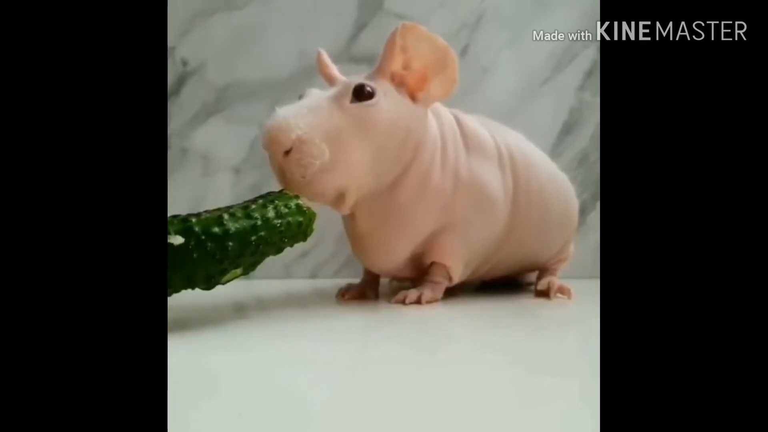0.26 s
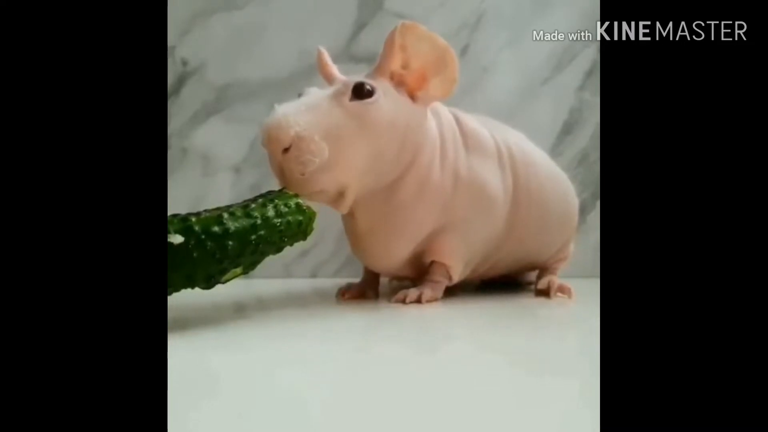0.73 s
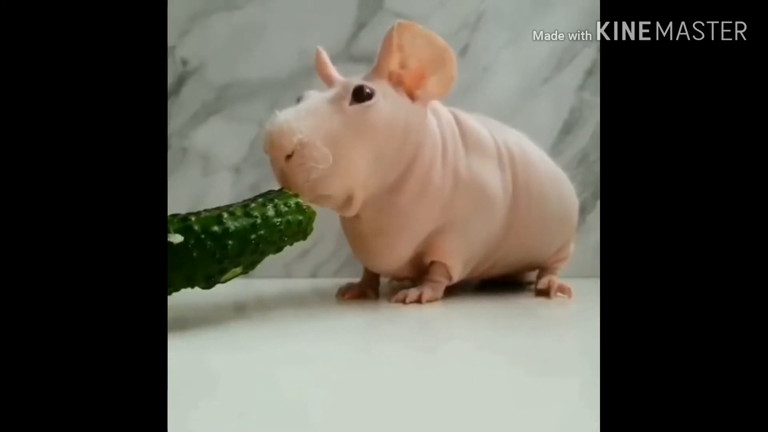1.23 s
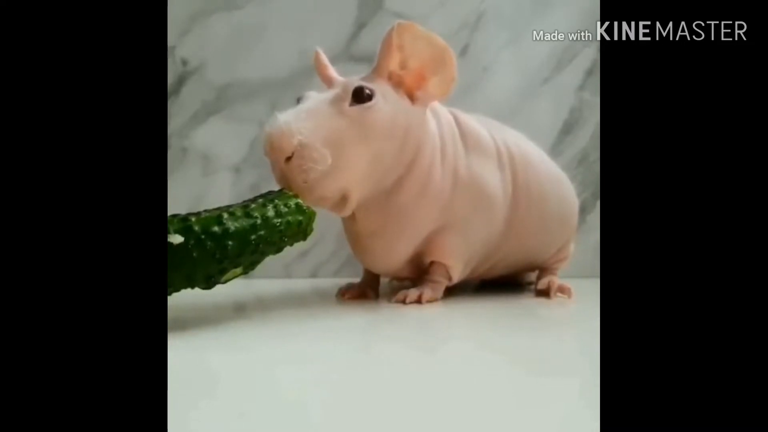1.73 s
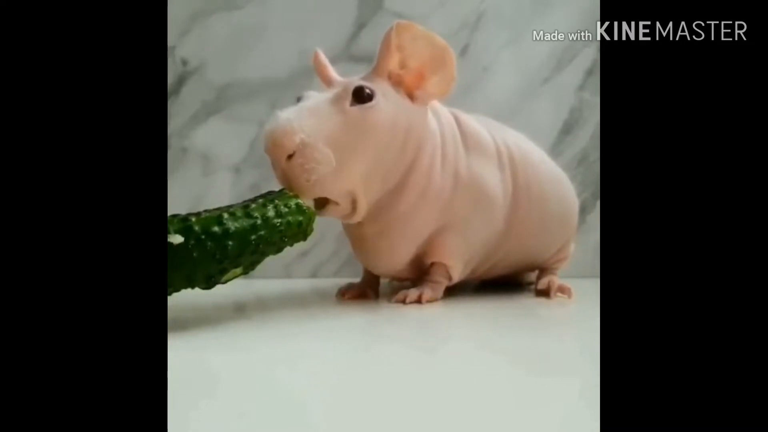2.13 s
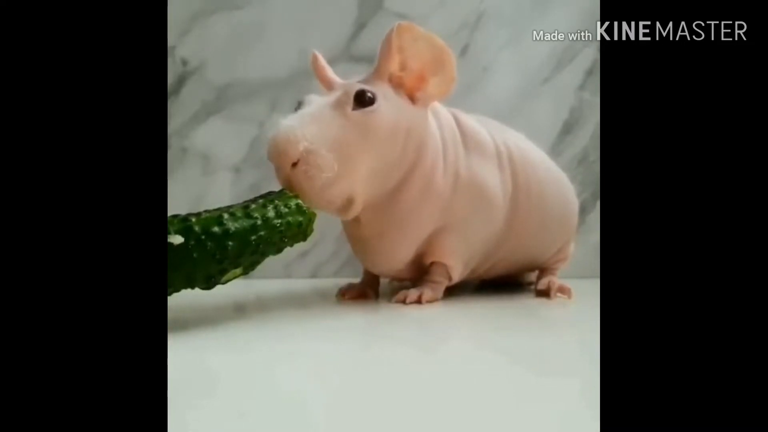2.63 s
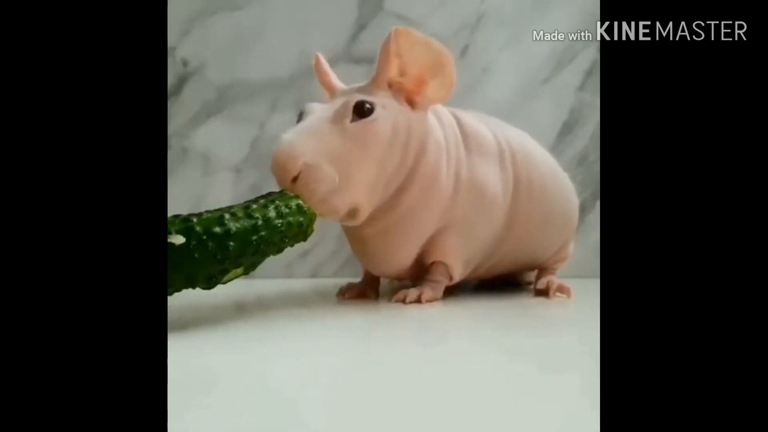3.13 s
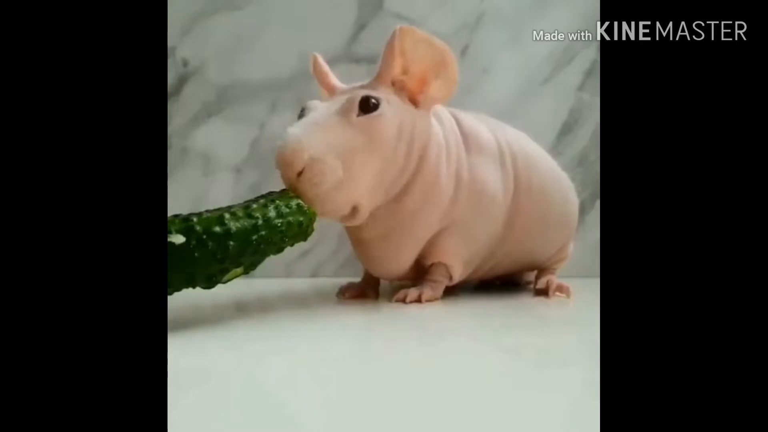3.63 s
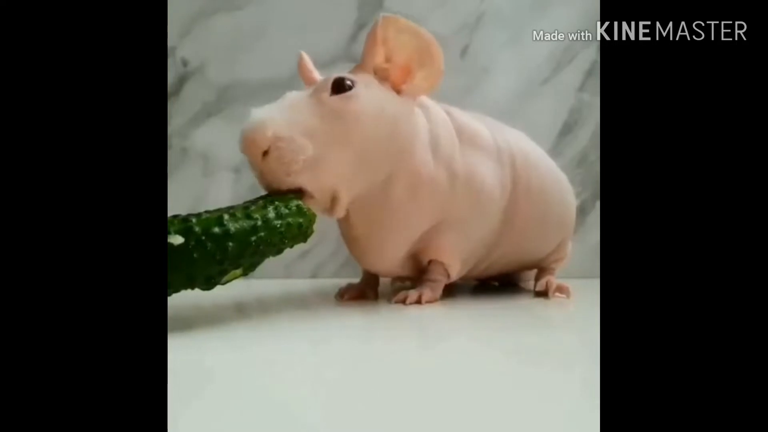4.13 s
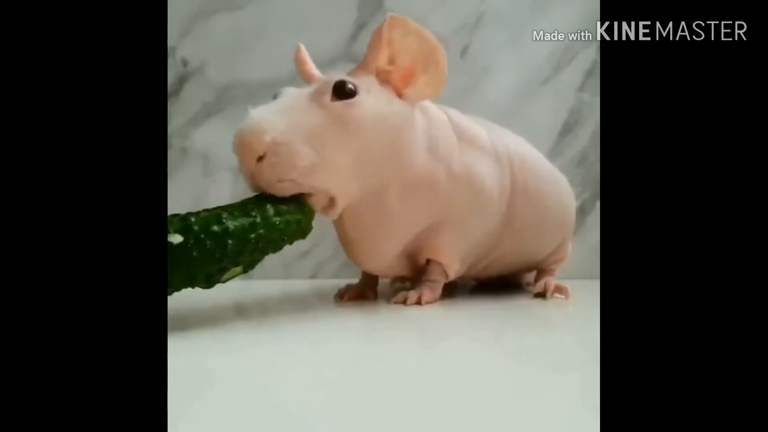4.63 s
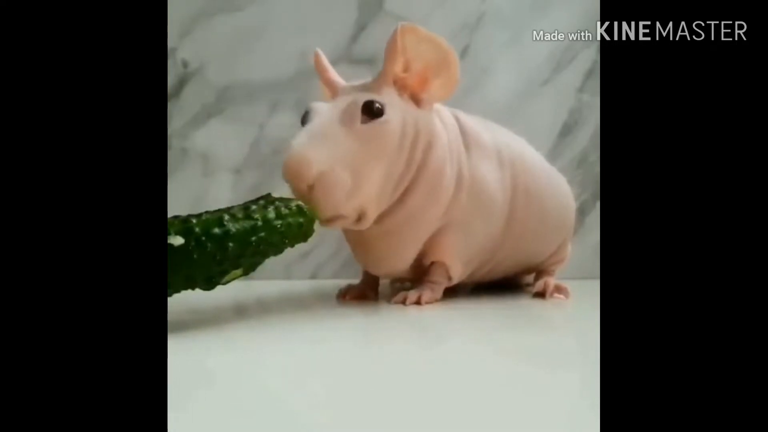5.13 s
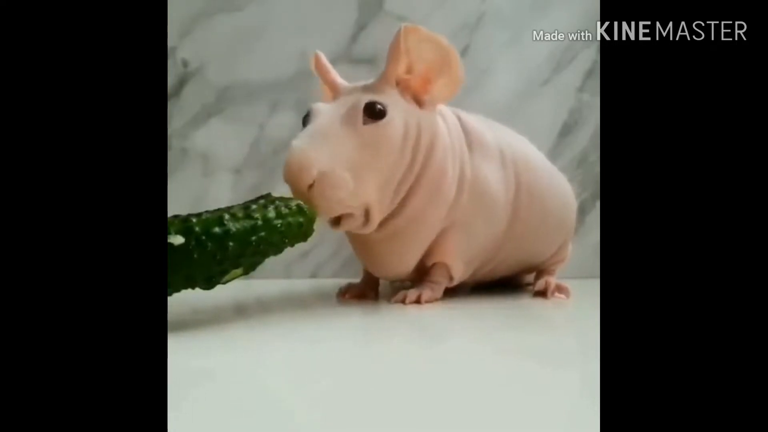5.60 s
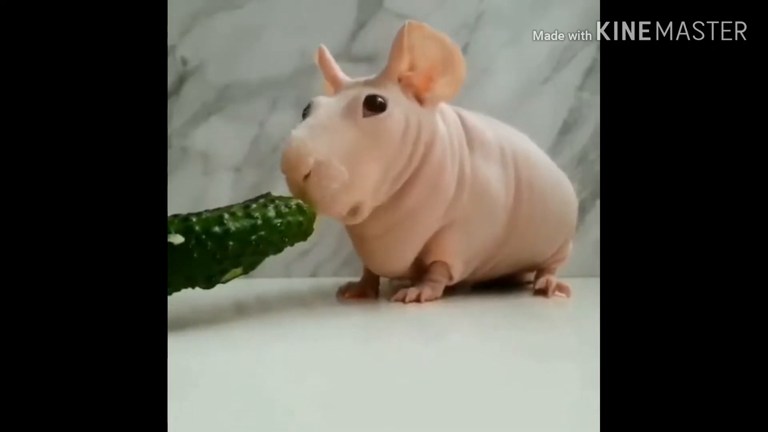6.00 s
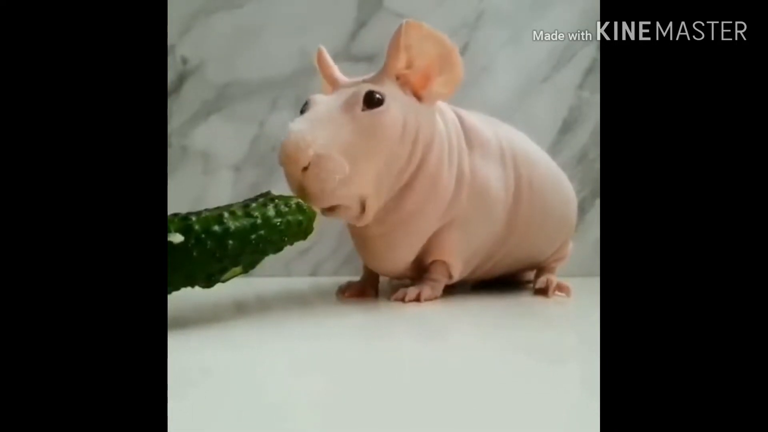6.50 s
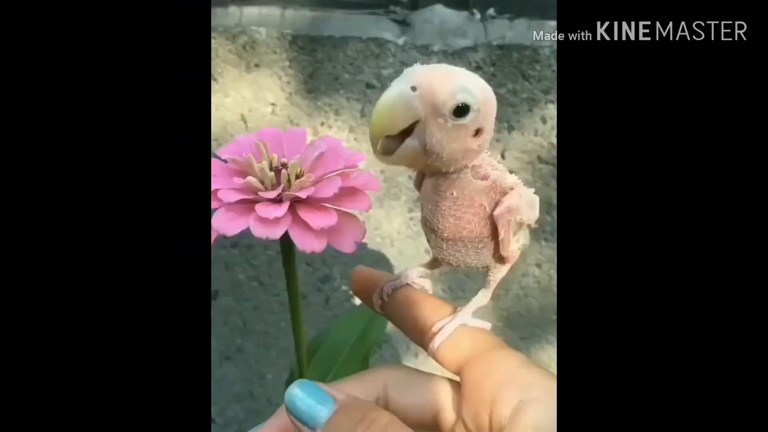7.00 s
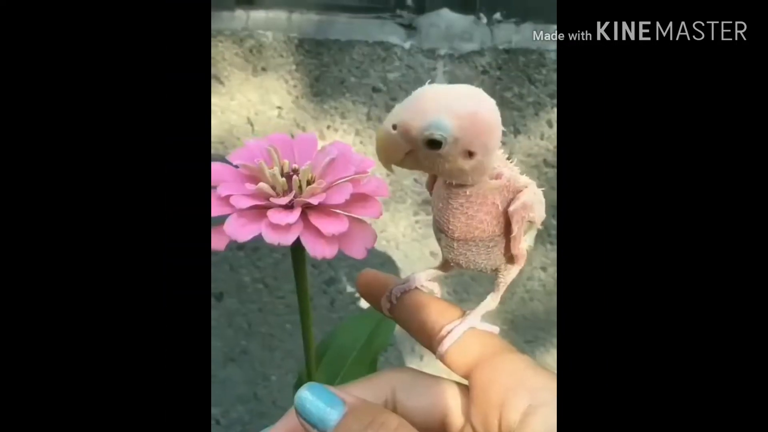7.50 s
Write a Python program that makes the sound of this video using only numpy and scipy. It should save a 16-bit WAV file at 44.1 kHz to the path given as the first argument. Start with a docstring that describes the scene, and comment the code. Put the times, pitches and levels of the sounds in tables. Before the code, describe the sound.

Close, soft, steady wet chewing of cucumber over low room rumble, two crisp bites, two sharp snaps, brief silence, then a bird squeak and swelling drone.

```python
"""Soft, steady crunching comes first, over a low room rumble: a guinea pig chews cucumber close to a microphone.
Its back teeth burst clouds of tiny cells about six times a second, with small wet ticks in between.
It tears off a new piece with two crisp bites, nibbles and chews on, and two bits snap sharply.
After a moment of silence, outdoors: a parrot chick's short squeak made of overtones, a high shimmer of
filtered noise that fades, and an engine-like drone of steady tones and noise that swells."""
import sys
import numpy as np
from scipy import signal
from scipy.fft import rfft, irfft
from scipy.io import wavfile
from scipy.ndimage import uniform_filter1d

SR = 44100
rng = np.random.default_rng(int(sys.argv[2]) if len(sys.argv) > 2 else 0)


def store_pcm(level_fs):
    """Save levels as 16-bit WAV."""
    pcm = np.round(np.clip(level_fs, -1, 1) * 32767).astype(np.int16)
    wavfile.write(sys.argv[1], SR, np.atleast_2d(pcm).T)


N = 341774
TIME = np.arange(N) / SR
INDOOR_END_S, OUTDOOR_START_S = 6.885, 7.1255
EDGE_HZ = 14300  # top of the recorder's band

# Levels are starting values: envelopes and the gains in the functions still act on them.
# All spectra list f/Hz, level/dB and give only the shape of the sound.

# Room rumble over time: t/s, level/dB
RUMBLE_LEVEL = [(0, -68), (2.65, -67), (3.0, -55), (3.36, -57), (3.5, -63.5), (4.45, -61.5), (4.77, -58.5),
                (4.88, -71), (6.15, -69), (6.88, -73.5)]
# Spectrum of the room rumble: f/Hz, level/dB
ROOM_SPECTRUM = [(15, -34.5), (30, -13), (45, 3.5), (65, -6.5), (92, 6.5), (125, -6.5), (175, -3),
                 (250, -14), (350, -17), (600, -35), (1200, -42.5), (4000, -49)]
# Spectrum of the microphone hiss: f/Hz, level/dB
HISS_SPECTRUM = [(100, 1.5), (600, 0), (1500, -1.5), (2200, -0.5), (3700, -1.5), (6000, -2.5), (9000, -5),
                 (12400, 1.5), (13000, -5.5), (13500, -28.5)]
# Deep hums that rise and stop: t/s, length/s, first f/Hz, last f/Hz, first level/dB, last level/dB
DEEP_HUMS = [(1.331, 1.101, 36.2, 41.5, -64, -52.5), (4.045, .68, 42.3, 43.9, -64, -61.5)]
# When in the hum it speeds up (share of its length), how fast, and its fade at both ends
HUM_TURN_SHARE, HUM_TURN_S, HUM_FADE_S = 0.59, 0.12, 0.1

# Open-air wash over time: t/s, level/dB
STREET_LEVEL = [(7.19, -75), (7.35, -61.5), (7.47, -61), (7.75, -54.5)]
# Spectrum of the open-air wash: f/Hz, level/dB
STREET_SPECTRUM = [(20, -22.5), (60, 4), (140, 9), (200, 0), (400, -2), (650, -7), (950, -7.5), (1600, -14),
                   (2500, -18.5), (4000, -28), (7000, -34), (13500, -37), (14200, -68.5)]
# Swell of the drone, shared by its tones and its rumble: t/s, level/dB
DRONE_SWELL_LEVEL = [(7.13, -22.5), (7.3, -5), (7.57, -8.5), (7.65, 4), (7.75, -1)]
# Tones of the drone, before the swell: f/Hz, level/dB
DRONE_TONES = [(61, -53.5), (112, -49), (239, -80), (335, -69.5), (942, -80), (1394, -71.5)]
# Spectrum of the drone's rumble: f/Hz, level/dB
DRONE_SPECTRUM = [(20, -24), (35, -13.5), (50, -5.5), (62, 1), (95, 0.5), (125, -10), (170, -28.5),
                  (400, -75)]
# Spectrum of the brighter noise as the drone nears: f/Hz, level/dB
GLARE_NOISE_SPECTRUM = [(900, -25.5), (1900, -1), (2500, 2), (3200, -13), (4500, -20), (9000, -39)]
GLARE_START_S, GLARE_RISE_S = 7.6, 0.14
# Spectrum of the high shimmer: f/Hz, level/dB
SHIMMER_SPECTRUM = [(1500, -29.5), (3000, -21), (4000, -17), (4600, -4.5), (5200, -6), (5800, -16.5),
                    (9500, -24), (11400, -28), (13300, -29), (14200, -51)]
SHIMMER_FADE_DB_PER_S = 41.5

# The squeak in its lower register: t/s, f/Hz, level/dB
SQUEAK_PATH = [(7.126, 2524, -31.5), (7.132, 2680, -29), (7.141, 3184, -29.5), (7.148, 2516, -30),
               (7.155, 2374, -33), (7.162, 1686, -40), (7.17, 1640, -49)]
# Leaps of the squeak to a louder, purer upper register: t/s, length/s, f/Hz, sag/Hz per s
SQUEAK_LEAPS = [(7.134, 0.0057, 4770, 34800), (7.1415, .0059, 5350, 150000)]
LEAP_EDGE_S, LEAP_DB = 0.0014, 4.7
LOW_SECOND_DB, HIGH_SECOND_DB = 13.5, -13.5  # second harmonic against the first, in each register
# Roughness 0-1: the lower register grows hoarse as it runs out
ROUGH_START, ROUGH_END, ROUGH_HIGH = 0.44, 0.91, 0.19

# Ringing modes of the cucumber, lowest first: f/Hz, level/dB, factor on the decay
CUCUMBER_MODES = [(350.7, 1.5, 1.0), (520, -11, 0.99), (744, -3.5, 0.99), (847, -7.5, 0.34),
                  (1230, -11, 0.7), (1570, -11.5, 1)]
# Spectrum of the dull thud of its soft flesh: f/Hz, level/dB
THUD_SPECTRUM = [(90, -11.5), (200, 0), (280, 1.5), (450, -4), (620, -13), (1100, -23.5), (1800, -22.5),
                 (4000, -45.5)]
# Sharp snaps: t/s, peak level/dB of the crack, brightness/dB, knock level/dB
SHARP_SNAPS = [(6.1316, -7, -1, -51), (6.2628, -9.5, 10.5, -61)]
# Spectrum of a snap: f/Hz, level/dB
SNAP_SPECTRUM = [(100, -27.5), (700, -18.5), (2200, -14.5), (3100, -3), (4400, 2), (5600, -4), (7000, -9.5),
                 (9600, -14), (11100, -3), (12400, -7), (13500, -15.5), (14200, -30)]

# Light nibbles of the front teeth on the torn piece: t/s, length/s, level/dB
LIGHT_NIBBLES = [(4.9222, 0.0029, -52), (4.942, 0.054, -65.5), (5.0015, 0.0027, -54.5), (5.082, .0024, -55),
                 (5.149, 0.0083, -59.5), (5.317, .017, -60.5), (5.483, 0.03, -58), (5.631, 0.0014, -63),
                 (5.653, 0.0018, -63)]
# Spectrum of a nibble: f/Hz, level/dB
NIBBLE_SPECTRUM = [(1000, -28), (3000, -22), (4500, -9), (5600, -2), (6600, 6), (8500, 0.5), (10500, -1),
                   (12400, 2), (13100, -9), (13700, -25)]
NIBBLE_RISE_SHARE, TRAIL_DB, TRAIL_S = 0.59, -18.5, 0.03  # builds, lets go, leaves a faint rustle

# The front teeth saw into the skin: t/s, rise/s, fall/s, level/dB, brightness/dB
BITE_STROKES = [(4.471, .028, 0.019, -44.5, 7), (4.685, 0.018, 0.022, -38, 5), (4.725, 0.01, .025, -52, -6),
                (4.768, 0.014, 0.016, -44, -12)]
# The flesh rips in a run of bursting cells: t/s, level/dB, brightness/dB
FLESH_RIPS = [(4.5128, -20.5, 0), (4.5205, -22, 0), (4.7624, -31.5, -3), (4.7672, -30, 4.5),
              (4.7778, -37.5, -8), (4.785, -37, 8)]
# Spectrum of bites and rips: f/Hz, level/dB
CRISP_SPECTRUM = [(300, -21), (1500, -18), (2200, -19.5), (3400, -8.5), (4900, -8.5), (5500, -6), (6600, 1),
                  (8200, -4.5), (10500, 1), (12400, 2.5), (13100, -3), (13900, -27.5)]
RIP_RISE_S, RIP_FALL_S = 0.0026, 0.004
# Loose cells go on bursting after each rip (level against the rip)
CRUMBLE_DB, CRUMBLE_RISE_S, CRUMBLE_DECAY_S, CRUMBLE_BRIGHT_DB = -13, 0.005, 0.0083, -2
# The cucumber jolts as the flesh gives way: t/s, level/dB, hardness/dB on the upper modes
CUCUMBER_JOLTS = [(2.15, -59, -13), (4.493, -47.5, -10), (4.517, -40, -13.5), (4.533, -44, 3.5),
                  (4.703, -44, -15), (4.742, -51.5, 0), (4.782, -50.5, -1), (4.97, -65, -13)]
JOLT_DECAY_S, HARD_LINGER_PER_DB = 0.0106, 0.0851  # decay at hardness 0; a softer jolt dies away sooner

# Short ticks: wet clicks of lips and teeth, the crisp cracks within the two bites,
# and a brief dull burst (the last row) just ahead of the second snap: t/s, level/dB, brightness/dB
SHORT_TICKS = [(.566, -58.5, 3), (.597, -55.5, -5), (.669, -60, 10), (1.739, -56.5, -10), (2.199, -56, 0),
               (3.778, -57, 4), (3.905, -53, 13), (3.953, -51.5, 9), (3.988, -48.5, 9), (4.018, -60, 6),
               (4.027, -56, 6), (4.234, -59, 9), (4.456, -60, 6.5), (4.4926, -32.5, 31), (4.5106, -40, 7.5),
               (4.7503, -33.5, 28), (5.664, -51.5, 26), (6.117, -50.5, 0), (6.24, -44, 7.5),
               (6.2591, -42.5, -6)]
# Strokes of the back teeth: t/s, level/dB, firmness of the piece (0-1)
CHEW_STROKES = [(0, -75.5, 1), (.112, -68, 1), (0.272, -67.5, 1), (0.42, -67.5, 0.6), (0.581, -68, 1),
                (0.725, -67.5, 0.82), (0.89, -71, .3), (1.109, -68.5, .1), (1.259, -68.3, .55),
                (1.41, -72.5, 0.44), (1.575, -72, 0.72), (1.717, -66.5, 0.06), (1.872, -72, .15),
                (2.034, -73.5, 0.15), (2.189, -64, 0.74), (2.352, -75, 0.1), (2.509, -73.5, 0.53),
                (2.649, -73.5, 0), (2.794, -65.5, 0.54), (2.961, -70, 0.12), (3.174, -68.5, 0.54),
                (3.308, -71, 0), (3.47, -71, 0.54), (3.627, -70.5, 0.54), (3.771, -70.5, 0.85),
                (3.914, -68.5, 0.27), (4.072, -70, 1), (4.222, -71.5, 0.28), (5.663, -71, 0.76),
                (5.826, -70, 0.02), (5.978, -73, .25), (6.127, -72, 0), (6.277, -69, 0.93),
                (6.427, -75, 0.84), (6.588, -71, 0.99), (6.736, -73.5, 0.63)]
# Spectrum of chewing and ticks: f/Hz, level/dB
MOLAR_SPECTRUM = [(600, -37.5), (1200, -11.5), (2100, -18.5), (2600, -5.5), (3800, 1), (4900, -7.5),
                  (6700, -1.5), (8400, -9.5), (10000, -8), (12000, 0.5), (13000, -7), (13400, -43)]
# A firm piece breaks early in the stroke and sounds dull; soft pulp is squeezed late and sounds bright
STROKE_S, FIRM_RISE_S, SOFT_RISE_S = 0.079, 0.009, 0.069
FIRM_BRIGHT_DB, SOFT_BRIGHT_DB = -8, 0.5
USUAL_CHEW_DB, DULLING_DB_PER_DB = -68.5, 0.12  # heavier strokes are duller too


def amp(db):
    """Turns decibels into a gain."""
    return 10 ** (np.asarray(db) / 20)


def unit(x):
    """Scales a signal to an average strength (rms) of 1."""
    return x / np.sqrt(np.mean(x ** 2) + 1e-20)


def smooth_noise(count, size):
    """Random values smoothed by a running average over size samples, at rms 1."""
    return unit(uniform_filter1d(rng.standard_normal(count), size=size))


def slow_drift(size):
    """A slow random drift over the whole scene: noise averaged twice, at rms 1."""
    once = uniform_filter1d(rng.standard_normal(N), size=size)
    return unit(uniform_filter1d(once, size=size))


def wavering(depth_db, size=5000):
    """A gain that wanders at random, several times a second."""
    return amp(depth_db * slow_drift(size))


def level(rows):
    """Gain over the whole scene, joining the (t/s, level/dB) points by straight lines."""
    return amp(np.interp(TIME, *np.transpose(rows)))


def add(mix, s, sound):
    """Mixes a sound in at time s, cut off where the mix ends."""
    part = mix[max(round(s * SR), 0):][:len(sound)]
    part += sound[:len(part)]


def shape_db(points, hz, bright_db=0, shelf_hz=6000):
    """Reads a spectrum on a log frequency axis and lifts or lowers its treble."""
    f, db = np.transpose(points)
    treble_share = 1 - 1 / (1 + (hz / shelf_hz) ** 5)
    return np.interp(np.log(hz + 1), np.log(f), db) + bright_db * treble_share


def colour(x, points, bright_db=0):
    """Filters x with a spectrum, then scales it to rms 1."""
    hz = np.fft.rfftfreq(len(x), 1 / SR)
    return unit(irfft(rfft(x) * amp(shape_db(points, hz, bright_db)), len(x)))


def noise(points):
    """Steady noise with a spectrum, as long as the scene."""
    return colour(rng.standard_normal(N), points)


def cells(per_s, spread_db, size=16384):
    """Tiny fractures at random moments, a few much larger than the rest."""
    height_db = spread_db * np.minimum(rng.exponential(1, size), 4)
    height = amp(height_db) * rng.choice([-1, 1], size)
    return height * (rng.random(size) < per_s / SR)


def stroke(rise, fall, size=16384):
    """Pressure builds up evenly, then lets go."""
    t = np.arange(size) / SR
    return np.minimum(t / rise, 1) * np.exp(-(np.maximum(t - rise, 0) / fall) ** 2)


def glint(x, longest_s=0.003, strength=0.38, count=5):
    """A few reflections off table and jaw comb the sound, differently each time as the head moves."""
    out = x.copy()
    for delay, sign in rng.random((count, 2)):
        add(out, longest_s * delay, np.sign(sign - 0.5) * strength * x)
    return out / np.sqrt(1 + count * strength ** 2)


def humming():
    """A deep hum whose pitch and level climb together as it speeds up."""
    out = np.zeros(N)
    for s, length, first_hz, last_hz, first_db, last_db in DEEP_HUMS:
        t = np.arange(0, length, 1 / SR)
        speed = (1 + np.tanh((t - HUM_TURN_SHARE * length) / HUM_TURN_S)) / 2
        hz = first_hz + (last_hz - first_hz) * speed
        db = first_db + (last_db - first_db) * speed
        fade = np.minimum(np.minimum(t, length - t) / HUM_FADE_S, 1)
        tone = np.sqrt(2) * np.sin(2 * np.pi * np.cumsum(hz) / SR)
        add(out, s, fade * amp(db) * tone)
    return out


def background(rumble_db=0.5, rumble_waver_db=0.7, murk_db=-90, hiss_db=-79.5, hiss_waver_db=0.9):
    """Uneven room rumble, a dull mid-range wash, passing deep hums and microphone hiss."""
    rumble = amp(rumble_db) * level(RUMBLE_LEVEL) * wavering(rumble_waver_db) * noise(ROOM_SPECTRUM)
    murk_spectrum = [(150, -10), (350, 2.5), (600, 6.5), (900, -5.5), (1700, -12.0), (3000, -34.0)]
    murk = amp(murk_db) * noise(murk_spectrum)
    hiss = amp(hiss_db) * wavering(hiss_waver_db) * noise(HISS_SPECTRUM)
    return rumble + murk + humming() + hiss


def room(x, t60=0.22, onset_s=0.0013, size=16384):
    """A short bright tail from hard nearby surfaces, falling 60 dB in t60 seconds."""
    t = np.arange(size) / SR
    tail_spectrum = [(200, -3.0), (2000, 1.5), (6500, 1.0), (9000, -3.0), (13000, -1.5)]
    tail = colour(rng.standard_normal(size), tail_spectrum)
    tail *= amp(-60 * t / t60) * (1 - np.exp(-t / onset_s))
    return signal.fftconvolve(x, tail / np.linalg.norm(tail))[:N]


def outdoors(drone_db=-46.0, glare_db=-68.0, shimmer_db=-59.0, waver=0.0037):
    """An engine-like drone and a wash of open-air noise swell while a high shimmer dies away."""
    turns_per_hz = np.cumsum(1 + waver * slow_drift(3000)) / SR  # all tones drift in pitch together
    tones = np.sqrt(2) * sum(amp(db) * np.sin(2 * np.pi * hz * turns_per_hz) for hz, db in DRONE_TONES)
    drone = level(DRONE_SWELL_LEVEL) * (tones + amp(drone_db) * noise(DRONE_SPECTRUM))
    street = level(STREET_LEVEL) * noise(STREET_SPECTRUM)
    glare_rise = np.clip((TIME - GLARE_START_S) / GLARE_RISE_S, 0, 1)
    glare = amp(glare_db) * glare_rise * noise(GLARE_NOISE_SPECTRUM)
    fade_db = SHIMMER_FADE_DB_PER_S * np.maximum(TIME - OUTDOOR_START_S, 0)
    shimmer = amp(shimmer_db - fade_db) * noise(SHIMMER_SPECTRUM)
    return drone + street + glare + shimmer


def squeak(jitter=0.012, hoarse_jitter=0.06, shimmer=0.33, upper_db=-8, slope_db=1.0):
    """A harmonic chirp leaps up in pitch and falls back; pitch and strength shake as it turns hoarse."""
    s, *columns = np.transpose(SQUEAK_PATH)
    t = np.arange(s[0], s[-1], 1 / SR)
    hz, db = (np.interp(t, s, c) for c in columns)
    high = np.zeros(len(t))  # 0 = lower register, 1 = upper
    for start, length, leap_hz, sag in SQUEAK_LEAPS:
        from_edge = np.minimum(t - start, start + length - t)
        inside = np.clip(from_edge / LEAP_EDGE_S + 0.5, 0, 1)
        hz = hz + inside * (leap_hz - sag * (t - start) - hz)
        high = np.maximum(high, inside)

    hoarse = ROUGH_START + (ROUGH_END - ROUGH_START) * np.linspace(0, 1, len(t)) ** 2
    rough = np.clip(hoarse + high * (ROUGH_HIGH - hoarse), 0, 1)
    shake, flutter = smooth_noise(len(t), 30), smooth_noise(len(t), 30)
    shaken_hz = hz * (1 + (jitter + hoarse_jitter * rough) * shake)
    phase = 2 * np.pi * np.cumsum(shaken_hz) / SR

    second_db = LOW_SECOND_DB + high * (HIGH_SECOND_DB - LOW_SECOND_DB)
    upper = [np.clip(second_db, -10, 6) + upper_db + slope_db * k for k in range(5)]
    gains = amp([0 * t, second_db] + upper)  # seven harmonics
    # Harmonics above the recorder's band are left out
    tone = sum(g * np.sin(k * phase) * (k * hz < EDGE_HZ) for k, g in enumerate(gains, 1))
    tone = tone / np.sqrt((gains ** 2).sum(0) / 2)
    rasp_spectrum = [(200, -15.5), (1500, -42), (2600, -7), (4800, 6.0), (6500, 3.5), (9000, 0.5),
                     (11000, -15.0), (13000, 3), (14200, -20)]
    rasp = colour(rng.standard_normal(len(t)), rasp_spectrum)
    voice = np.sqrt(1 - rough ** 2) * tone * (1 + shimmer * rough * flutter) + rough * rasp
    out = np.zeros(N)
    add(out, s[0], amp(db + LEAP_DB * high) * voice)
    return out


def knock(decay, hard_db, wander=0.075, thud_db=-3, onset_s=0.0013, size=8192):
    """A dull thud; the cucumber's damped modes ring briefly, wavering as the teeth hold it."""
    t = np.arange(size) / SR
    sound = amp(thud_db) * colour(rng.standard_normal(size), THUD_SPECTRUM) * np.exp(-t / decay)
    for k, (hz, db, lasting) in enumerate(CUCUMBER_MODES):
        bend = 1 + wander * smooth_noise(size, 150)
        ring = np.sin(2 * np.pi * hz * np.cumsum(bend) / SR) * np.exp(-t / (decay * lasting))
        sound += np.sqrt(2) * amp(db + hard_db * (k > 0)) * ring  # hardness spares the lowest mode
    return sound * (1 - np.exp(-t / onset_s))


def snapping(crumble_db=-29, crumble_s=0.0029, size=4096):
    """One clean fracture, a brief crumble with it and a small knock."""
    out, t = np.zeros(N), np.arange(size) / SR
    hz = abs(np.fft.fftfreq(size, 1 / SR))
    for s, db, bright_db, knock_db in SHARP_SNAPS:
        log_gain = np.log(amp(shape_db(SNAP_SPECTRUM, hz, bright_db)))
        # Minimum phase: the crack itself has no sound before the break
        crack = np.fft.ifft(np.exp(np.conj(signal.hilbert(log_gain)))).real
        crumble = colour(rng.standard_normal(size), SNAP_SPECTRUM, bright_db) * np.exp(-t / crumble_s)
        add(out, s, amp(db) * (crack / abs(crack).max() + amp(crumble_db) * crumble))
        add(out, s, amp(knock_db) * knock(0.0081, 1.2))
    return out


def nibbling(per_s=14000, spread_db=3.0):
    """The front teeth shred the piece in thin, bright scrapes."""
    out = np.zeros(N)
    for s, length, db in LIGHT_NIBBLES:
        rise = NIBBLE_RISE_SHARE * length
        trail = amp(TRAIL_DB) * stroke(length, TRAIL_S)
        envelope = np.maximum(stroke(rise, length - rise), trail)
        scrape = envelope * colour(cells(per_s, spread_db), NIBBLE_SPECTRUM)
        add(out, s, amp(db) * glint(scrape, longest_s=0.0016))
    return out


def biting(per_s=8000, spread_db=2.3, shudder_db=-11, shudder_rise_s=0.0053, shudder_fall_s=0.04, size=16384):
    """Front teeth saw the skin, flesh rips and crumbles in jerks, and the jolting cucumber shakes the table."""
    out, t = np.zeros(N), np.arange(size) / SR
    crumble_decay = np.exp((CRUMBLE_RISE_S - t) / CRUMBLE_DECAY_S)
    crumble = amp(CRUMBLE_DB) * np.minimum(t / CRUMBLE_RISE_S, crumble_decay)
    tears = [(s, stroke(rise, fall), db, bright_db) for s, rise, fall, db, bright_db in BITE_STROKES]
    for s, db, bright_db in FLESH_RIPS:
        tears.append((s, stroke(RIP_RISE_S, RIP_FALL_S), db, bright_db))
        tears.append((s, crumble, db, CRUMBLE_BRIGHT_DB))
    for s, envelope, db, bright_db in tears:
        tear = envelope * colour(cells(per_s, spread_db), CRISP_SPECTRUM, bright_db)
        add(out, s, amp(db) * glint(tear, longest_s=0.0008, strength=0.21))
    for s, db, hard_db in CUCUMBER_JOLTS:
        decay = JOLT_DECAY_S * np.exp(HARD_LINGER_PER_DB * hard_db)
        add(out, s, amp(db) * knock(decay, hard_db))
        rumble = colour(rng.standard_normal(size), ROOM_SPECTRUM)
        add(out, s, amp(db + shudder_db) * stroke(shudder_rise_s, shudder_fall_s) * rumble)
    return out


def ticks(rise=0.00025, fall=0.0027, stray_chance=0.3, stray_within_s=0.093, stray_db=-66, stray_bright_db=7):
    """Millisecond clusters of fractures; now and then a faint one strays in around a chewing stroke."""
    out = np.zeros(N)
    strays = []
    for chew, (chance, when) in zip(CHEW_STROKES, rng.random((len(CHEW_STROKES), 2))):
        if chance < stray_chance:
            strays.append((chew[0] + stray_within_s * when, stray_db, stray_bright_db))
    for s, db, bright_db in list(SHORT_TICKS) + strays:
        add(out, s, amp(db) * stroke(rise, fall) * colour(cells(20100, 1.5), MOLAR_SPECTRUM, bright_db))
    return out


def chewing(per_s=13000, gain_db=4.5, treble_share=0.28, uneven_db=2.23, grit_per_s=90, grit_db=-8, size=16384):
    """Each sideways stroke grinds a cloud of wet cells and a few harder bits, catching and slipping."""
    out = np.zeros(N)
    for s, db, firmness in CHEW_STROKES:
        rise = np.interp(firmness, [0, 1], [SOFT_RISE_S, FIRM_RISE_S])
        bright_db = np.interp(firmness, [0, 1], [SOFT_BRIGHT_DB, FIRM_BRIGHT_DB])
        bright_db = bright_db - DULLING_DB_PER_DB * (db - USUAL_CHEW_DB)
        # Brighter strokes are a little louder overall, because they hold more treble
        treble_gain = np.sqrt(abs(1 - treble_share + treble_share * amp(bright_db) ** 2))
        catch = amp(uneven_db * smooth_noise(size, 260))
        fractures = unit(cells(per_s, 2.1)) + amp(grit_db) * unit(cells(grit_per_s, 1.5))
        grind = stroke(rise, STROKE_S - rise) * catch * colour(fractures, MOLAR_SPECTRUM, bright_db)
        add(out, s, amp(db + gain_db) * treble_gain * glint(grind))
    return out


def scene(wet_db=-15, snap_wet_db=-35):
    """The meal indoors, a silence, then the bird outdoors."""
    mouth = chewing() + ticks() + nibbling() + biting()
    snaps = snapping()
    echoes = room(amp(wet_db) * mouth + amp(snap_wet_db) * snaps)
    indoors = mouth + snaps + echoes + background()
    fade_out = np.clip((INDOOR_END_S - TIME) / 0.01, 0, 1)
    fade_in = np.clip((TIME - OUTDOOR_START_S) / 0.002, 0, 1)
    return (indoors * fade_out + outdoors() * fade_in + squeak())[None]


def record(dry):
    """The recorder's band limit: a steep filter removes what lies above EDGE_HZ."""
    lowpass = signal.firwin(255, EDGE_HZ, window=("kaiser", 8), fs=SR)
    return signal.oaconvolve(dry, lowpass[None], "same")


dry = scene()
out = record(dry)
store_pcm(out)
```